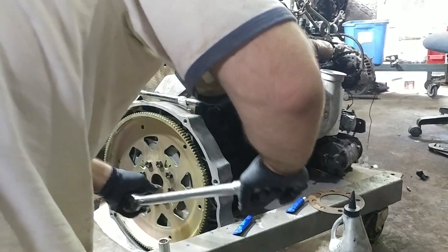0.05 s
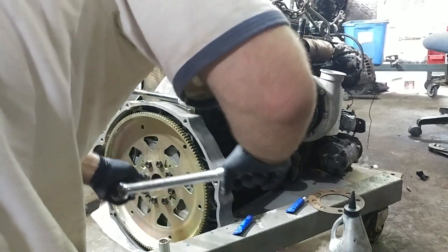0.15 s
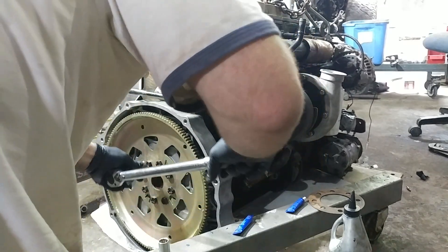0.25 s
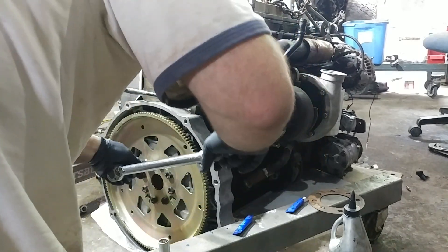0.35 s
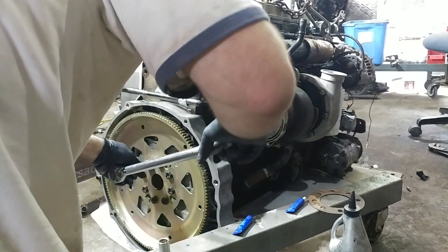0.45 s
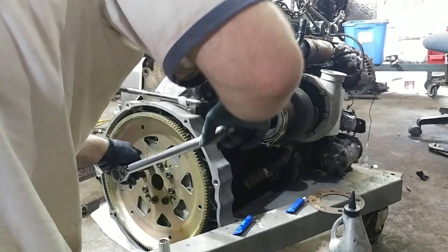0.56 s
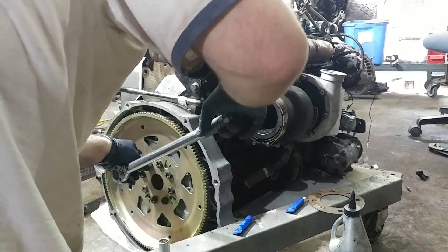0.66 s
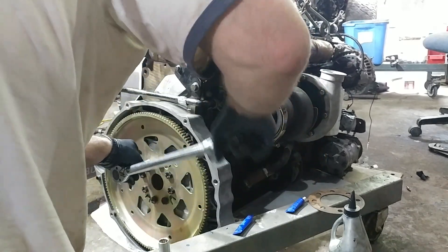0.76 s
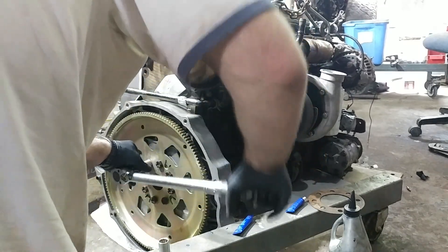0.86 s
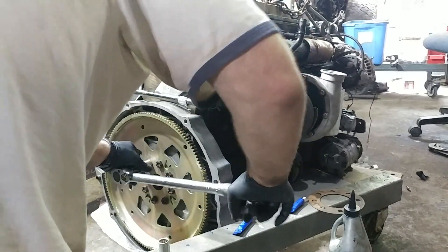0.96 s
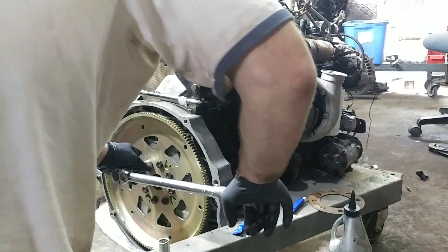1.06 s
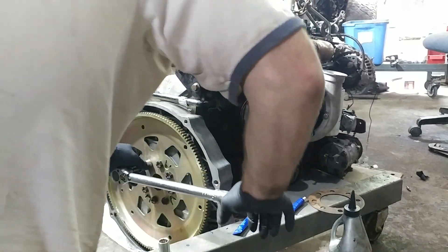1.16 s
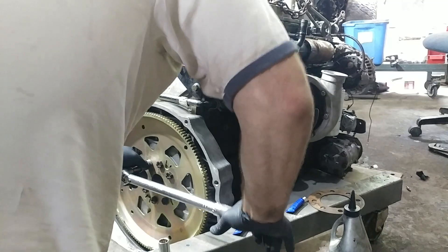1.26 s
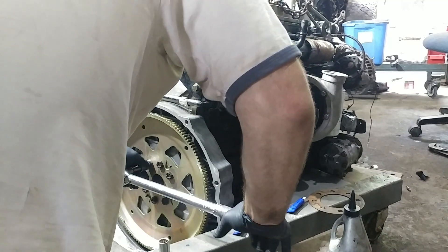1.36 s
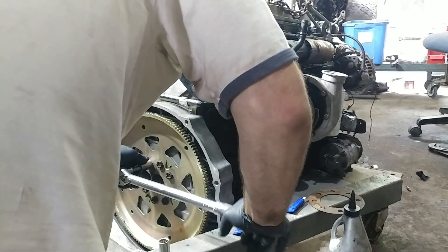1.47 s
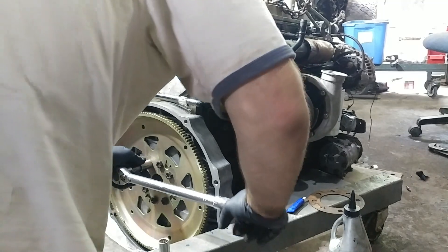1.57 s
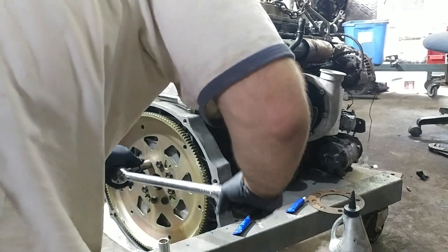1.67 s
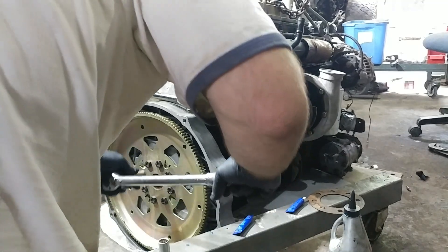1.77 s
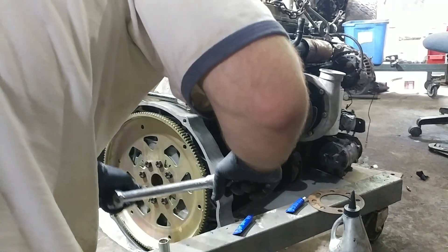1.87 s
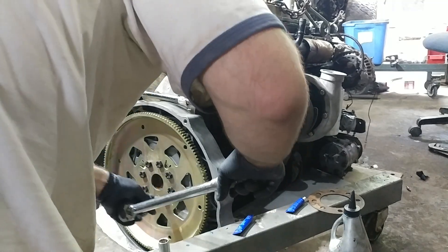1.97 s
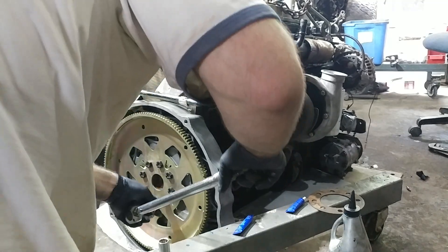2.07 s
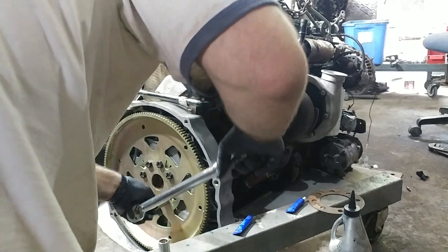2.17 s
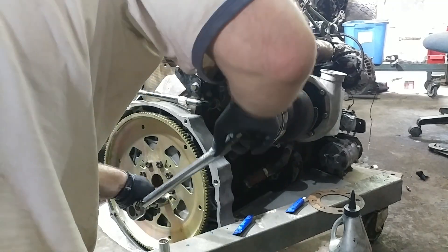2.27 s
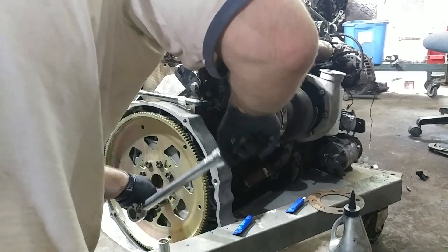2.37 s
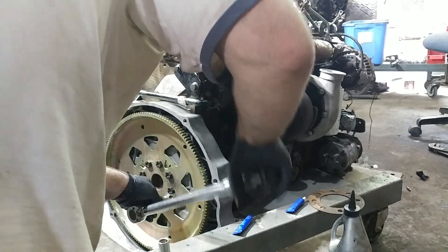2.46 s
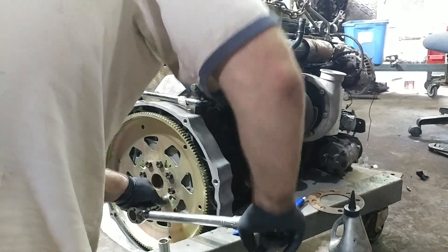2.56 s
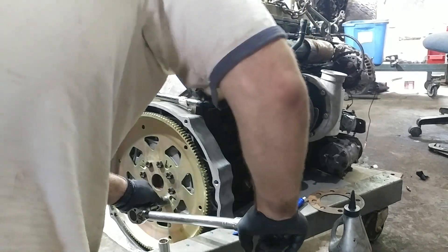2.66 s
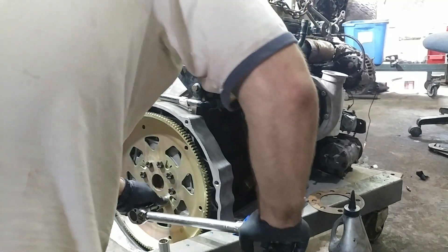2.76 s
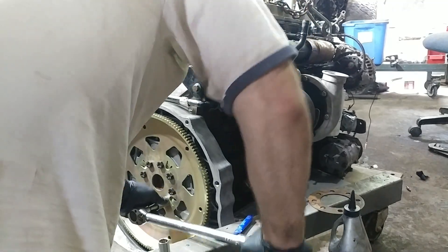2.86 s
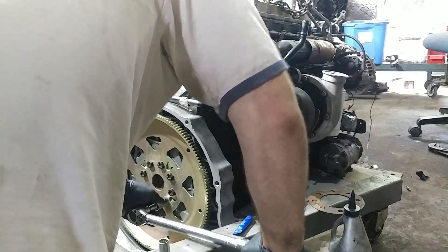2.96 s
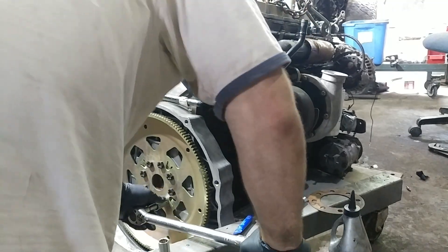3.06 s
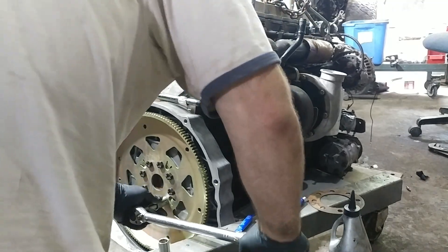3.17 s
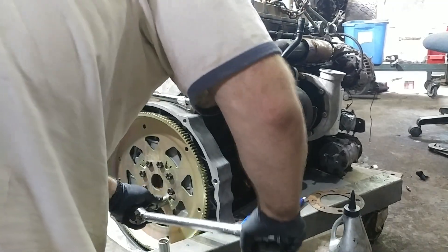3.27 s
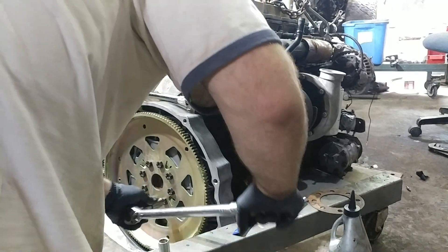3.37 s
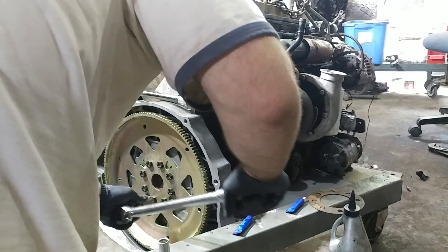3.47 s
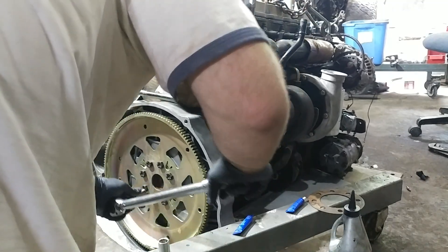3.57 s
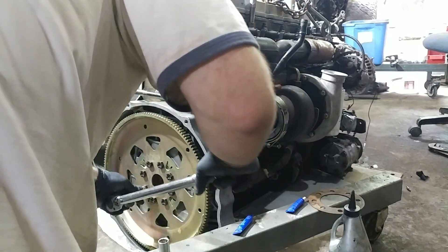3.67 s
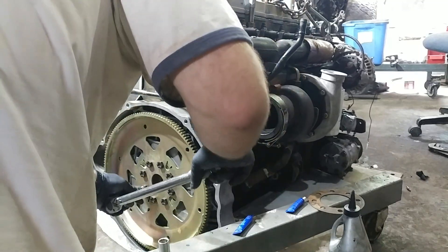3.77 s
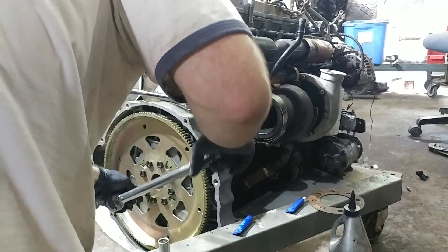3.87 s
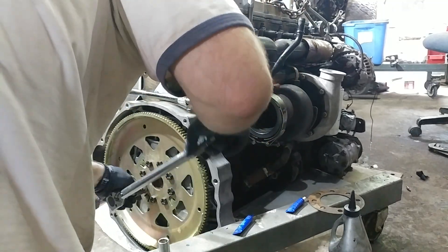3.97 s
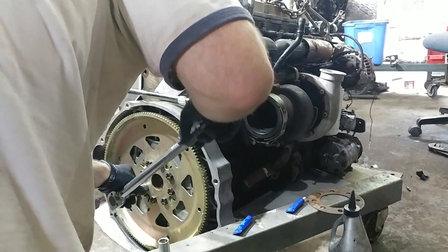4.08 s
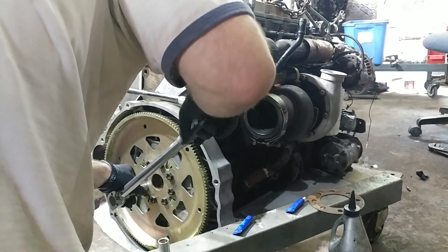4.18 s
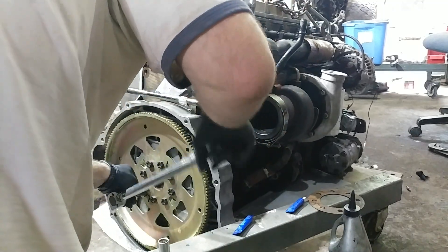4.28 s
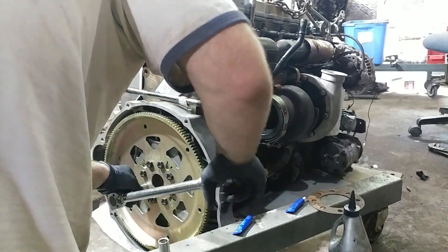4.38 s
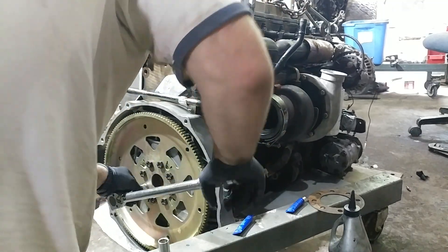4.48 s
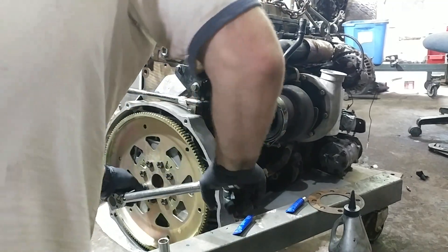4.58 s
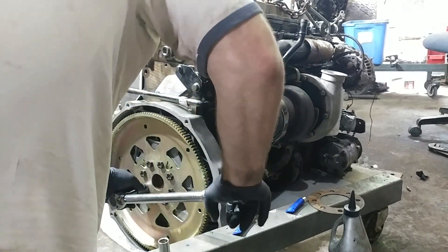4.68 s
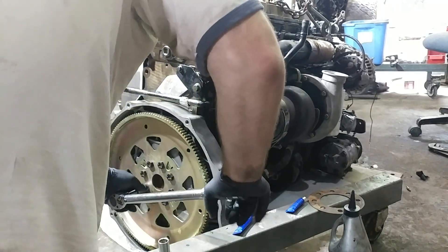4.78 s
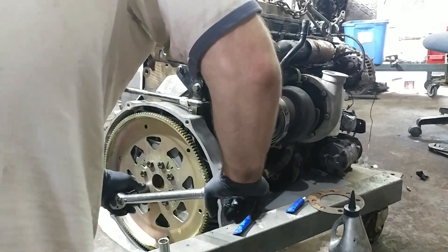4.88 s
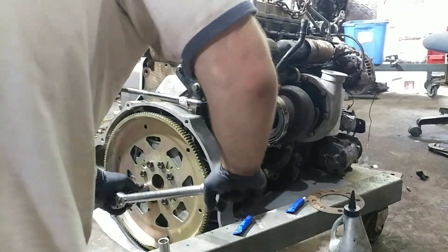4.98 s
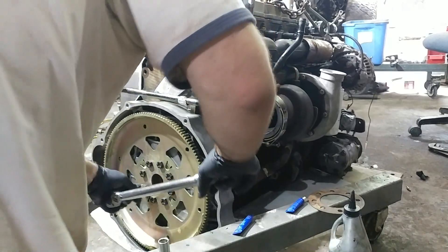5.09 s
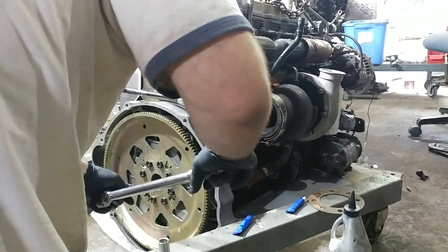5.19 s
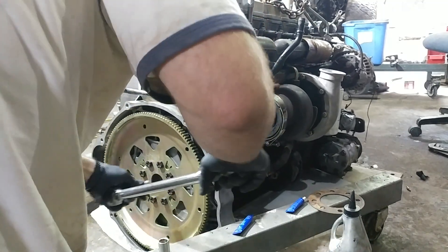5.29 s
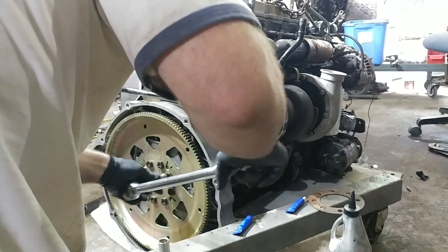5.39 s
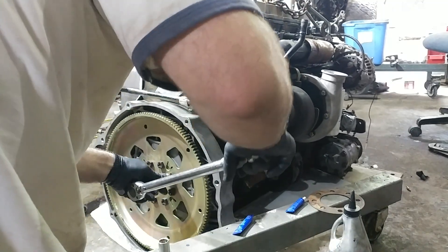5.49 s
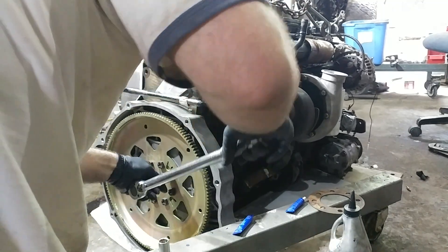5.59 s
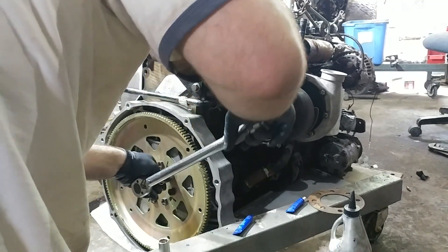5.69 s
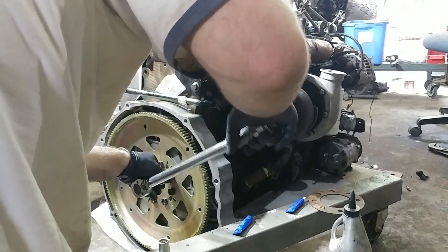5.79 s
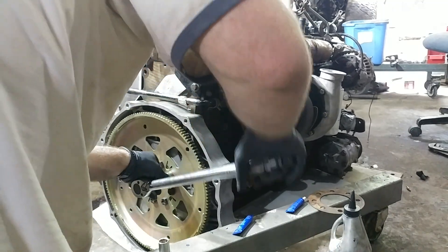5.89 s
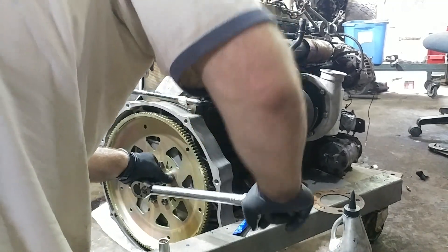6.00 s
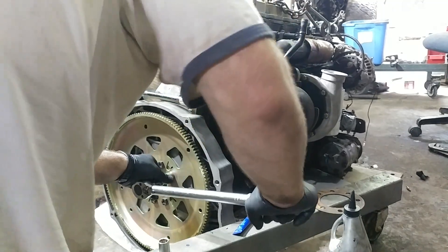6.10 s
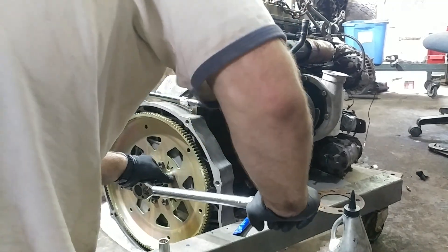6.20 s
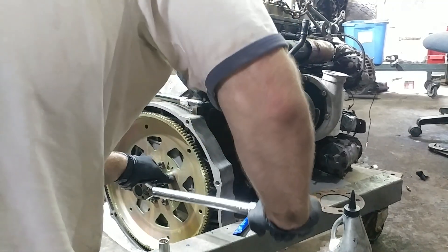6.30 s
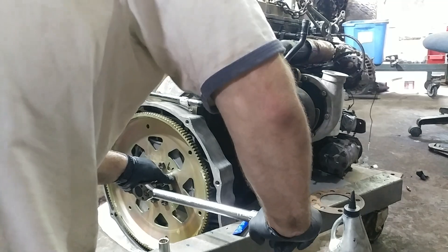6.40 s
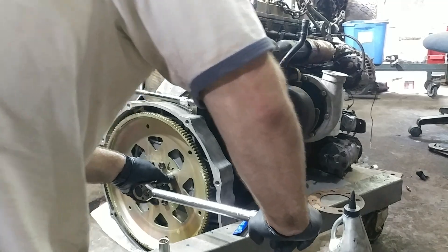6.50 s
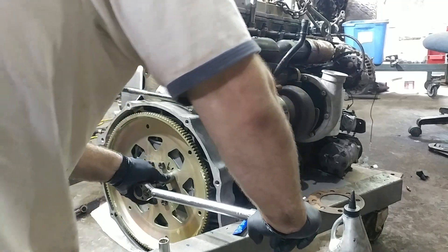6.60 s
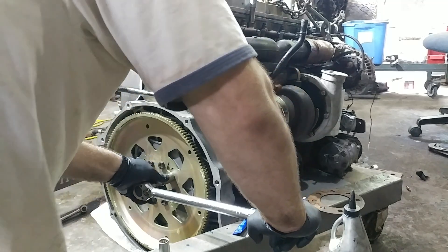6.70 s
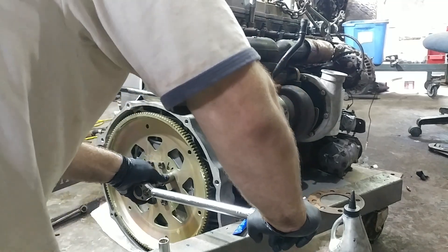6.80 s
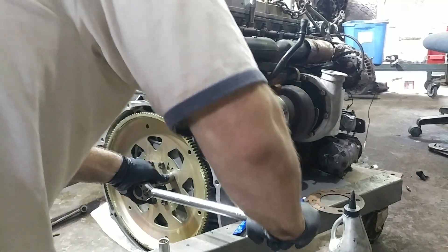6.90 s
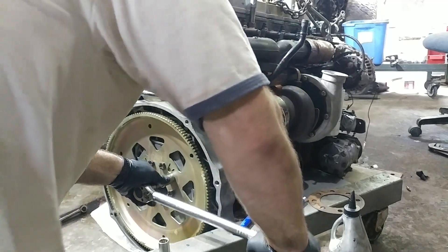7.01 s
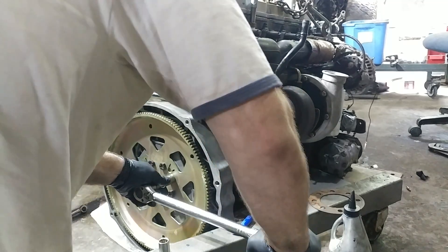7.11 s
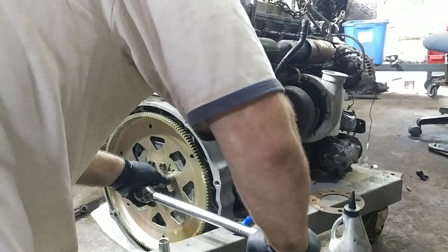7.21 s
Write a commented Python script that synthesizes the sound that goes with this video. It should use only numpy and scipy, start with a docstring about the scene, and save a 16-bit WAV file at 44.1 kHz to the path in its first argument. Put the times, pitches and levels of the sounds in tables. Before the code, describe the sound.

First socket knocks and a hard ratchet clack, then a bright wrench snap; more clinking, a second snap, busy clatter and a third snap, another cluster of knocks, and a final snap right at the end. Bare steel rings for a fraction of a second in a hard-walled workshop. Underneath, a thin hissy whine dips midway and returns slightly higher, over quiet bassy air.

```python
"""Torque wrench on a flywheel

In a workshop, flywheel bolts are tightened on an engine, heard through two microphone ports set close together.
The socket clinks and knocks onto bolts and flywheel, the ratchet head clacks, and at full torque the wrench
breaks with a loud snap that jolts the engine on its stand. Noise bursts make the clatter and decaying sines
the ringing; an echo tail adds the room. A faint high whine, rubbing cloth and room tone are shaped noise."""
import sys
import numpy as np
from scipy import signal
from scipy.fft import rfft, irfft, next_fast_len
from scipy.io import wavfile
from scipy.ndimage import uniform_filter1d

SR = 44100
rng = np.random.default_rng(int(sys.argv[2]) if len(sys.argv) > 2 else 0)


def store_wav(level_fs):
    """Save 16-bit WAV to argv[1]."""
    pcm = np.round(np.clip(np.atleast_2d(level_fs), -1, 1) * 32767)
    wavfile.write(sys.argv[1], SR, pcm.T.astype(np.int16))


N = 319725


def from_db(db):
    """Decibels to gain."""
    return 10 ** (np.asarray(db) / 20)


def rms_one(x):
    """Scale to unit rms."""
    return x / np.sqrt(np.mean(np.abs(x) ** 2) + 1e-20)


def at_hz(points, hz):
    """Read a table on a log-frequency axis."""
    f, value = np.transpose(points)
    return np.interp(np.log(np.maximum(hz, 1)), np.log(f), value)


def bins(size):
    """Frequencies in Hz of the spectrum of this many samples."""
    return np.arange(size // 2 + 1) * SR / size


def add(out, s, sound):
    """Mix a sound in at a time in seconds."""
    i = int(s * SR)
    out[:, i:i + sound.shape[-1]] += sound[..., :N - i]


# The ports are close together, so long waves reach both alike.
# Each row: frequency in Hz, left-right likeness from 0 to 1.
LIKENESS = [(150, 0.93), (400, 0.54), (1000, 0.49), (3000, 0.08), (15000, 0.14)]
PORT_LAG = 5  # samples by which shared sound reaches the right port later


def two_ports(size):
    """Spectra of white noise at both microphone ports; the shared part reaches the left one first."""
    hz = bins(size)
    shared, *own = rfft(rng.standard_normal((3, size)))
    alike = np.clip(at_hz(LIKENESS, hz), 0, 1)
    delay = np.exp(-2j * np.pi * hz / SR * [[0], [PORT_LAG]])
    return np.sqrt(alike) * shared * delay + np.sqrt(1 - alike) * np.array(own)


def clatter(colour, bass_db, treble_db, t60, rise_s, chatter_db):
    """Crowded steel modes die together within milliseconds while the faces chatter on each other."""
    size = SR // 4
    hz, t = bins(size), np.arange(size) / SR
    tilt_db = at_hz([(1400, bass_db), (2600, 0), (5500, 0), (11000, treble_db)], hz)
    gain = from_db(at_hz(colour, hz) + tilt_db)
    # the level is set by the 2 to 8.5 kHz range
    middle = (hz > 2000) & (hz < 8500)
    gain /= np.sqrt(np.mean(gain ** 2 * middle))
    chatter = rms_one(uniform_filter1d(rng.standard_normal(size), size=60))
    decay = from_db(-60 * t / t60 + chatter_db * chatter)
    return irfft(two_ports(size) * gain, size) * (1 - np.exp(-t / rise_s)) * decay


def ring(modes, rise_s, bass_db=0):
    """One blow on a body: modes start nearly in step, each with a slightly new strength; bass_db lifts low ones."""
    longest_s = max(t60 for _, _, t60 in modes)
    t, out = np.arange(int(1.2 * SR * longest_s)) / SR, 0
    for hz, db, t60 in modes:
        strength, start, apart = rng.uniform(-1, 1, 3)
        # the left port leads by the lag, and by a random phase where the ports are unlike
        skew = 2 * (1 - at_hz(LIKENESS, hz)) * apart + 2 * np.pi * hz * PORT_LAG / SR
        swing = np.exp((2j * np.pi * hz - np.log(1000) / t60) * t + 1j * start)
        gain = from_db(db + 2 * strength + at_hz([(1600, bass_db), (2600, 0)], hz))
        left, right = (swing * np.exp(1j * skew)).imag, swing.imag
        out = out + gain * np.array([left, right])
    return out * (1 - np.exp(-t / rise_s))


# The wrench breaks. Each row: start in seconds, level in dB before each layer's offset, extra bass in dB,
# extra treble in dB, engine jolt in dB.
BREAKS = [(1.253, -21.5, 3, 8.5, -45), (2.8935, -20.5, 4, 6.5, -33), (4.6712, -22, 4.5, 11, -38.5),
          (6.984, -20.5, 2, 8, -32)]
# Crowded, short-lived steel modes under a break. Each row: frequency in Hz, relative level per Hz in dB.
BREAK_COLOUR = [(35, -64.5), (60, -19), (189, -7), (274, -29.5), (651, -18.5), (785, -10), (1280, -23.5),
                (1550, -9.5), (2900, 3), (4970, 2), (5720, -6), (9350, -7), (12700, -16.5), (13900, -3.5),
                (16000, -35.5)]
# Ringing modes of the wrench tube, in three matching lists: frequency in Hz, relative level in dB, t60 in seconds.
WRENCH_HZ = [781, 2064, 2090, 2850, 3585, 4196, 4440, 4790, 4953, 6215, 7720, 8261, 12000, 14280]
WRENCH_DB = [-20, 5, 5, -2, 0, -1, 13, -22.5, -16.5, 9, 7.5, 3.5, 1.5, 2]
WRENCH_T60 = [0.22, 0.29, 0.096, 0.3, 0.26, 0.39, 0.13, .14, 0.17, 0.093, 0.11, 0.21, 0.044, .1]
WRENCH = list(zip(WRENCH_HZ, WRENCH_DB, WRENCH_T60))
# Ringing modes of the flywheel, which socket contacts also excite, in three matching lists:
# frequency in Hz, relative level in dB, t60 in seconds.
FLYWHEEL_HZ = [813, 926, 1170, 1276, 1567, 1587, 1823, 2529, 2847, 2939, 3150, 3213, 3304, 4721, 5131]
FLYWHEEL_DB = [0, -10.5, 6.5, -12, 2, 1, 0.5, 14, 9, 1.5, -13.5, 10, -11, 0, -2]
FLYWHEEL_T60 = [0.092, 0.15, 0.05, 0.13, 0.2, 0.34, 0.31, 0.13, 0.26, 0.39, 0.28, 0.27, 0.15, 0.41, 0.19]
FLYWHEEL = list(zip(FLYWHEEL_HZ, FLYWHEEL_DB, FLYWHEEL_T60))
# Modes of the engine on its stand. Each row: frequency in Hz, relative level in dB, t60 in seconds.
STAND = [(112, -11, .13), (156, -10, .2), (183, 0, .48), (208, -7, .16)]
STRAIN_LEAD_S, STRAIN_DB = 0.018, -52.5  # a faint dull tick of the loaded wrench before each break
GRIP_DETUNE = 0.005  # typical share by which the grip shifts each tube mode from break to break


def wrench_breaks():
    """The pawl snaps over: the tube cracks and rings, the flywheel answers, the engine jolts on its stand."""
    cracks, rings, jolts = np.zeros((3, 2, N))
    for s, db, bass_db, treble_db, jolt_db in BREAKS:
        tick = clatter(KNOCK_COLOUR, bass_db=20, treble_db=-5.5, t60=0.08, rise_s=0.001, chatter_db=5.0)
        add(cracks, s - STRAIN_LEAD_S, from_db(STRAIN_DB) * tick)
        snap = clatter(BREAK_COLOUR, bass_db, treble_db, t60=0.017, rise_s=0.00074, chatter_db=4.0)
        add(cracks, s, from_db(db + 11.5) * snap)
        # the parts rattle on after the snap
        rattle = clatter(BREAK_COLOUR, bass_db, treble_db, t60=0.088, rise_s=0.00083, chatter_db=0.93)
        add(cracks, s, from_db(db + 9.5) * rattle)
        gripped = [(hz * (1 + GRIP_DETUNE * rng.standard_normal()), mode_db, t60)
                   for hz, mode_db, t60 in WRENCH]
        add(rings, s, from_db(db - 9.0) * ring(gripped, rise_s=0.0007))
        add(rings, s, from_db(db - 14.0) * ring(FLYWHEEL, rise_s=0.0096))
        add(jolts, s, from_db(jolt_db) * ring(STAND, rise_s=0.012))
    return cracks, rings, jolts


# Modes of the socket. Each row: frequency in Hz, relative level in dB, t60 in seconds.
SOCKET = [(9241, -13, .1), (9442, 0, .028), (9514, -11, .15), (9590, -1, .025), (9620, 4, .012)]
SHORTER_DB_PER_DB = 0.2  # harder contacts die sooner: t60 shrinks by this many dB per dB of hardness


def socket_contacts(rows, colour, t60, crack_db, clatter_db, ping_db, rise_s):
    """Each contact cracks, clatters, pings the socket and rings the flywheel; hard ones are bright and short."""
    clatters, rings = np.zeros((2, 2, N))
    for s, db, bass_db, hard_db, socket_db, ring_db in rows:
        crack = clatter(colour, bass_db, hard_db - 1, t60=0.0079, rise_s=0.00021, chatter_db=3.0)
        add(clatters, s, from_db(db + crack_db) * crack)
        clatter_t60 = t60 * from_db(-SHORTER_DB_PER_DB * hard_db)
        body = clatter(colour, bass_db, hard_db, clatter_t60, rise_s, chatter_db=2.0)
        add(clatters, s, from_db(db + clatter_db) * body)
        add(rings, s, from_db(db + socket_db + ping_db) * ring(SOCKET, rise_s=0.0016))
        add(rings, s, from_db(db + ring_db) * ring(FLYWHEEL, rise_s=0.0077, bass_db=bass_db / 2))
    return clatters, rings


# The socket knocks on bolt and flywheel. Each row: start in seconds, level in dB before each layer's offset,
# extra bass in dB, hardness as extra treble in dB, socket ping in dB above the level before its offset,
# flywheel ring in dB above the level.
KNOCKS = [(0.3803, -21.5, 8, -1.5, -1, -13.5), (0.541, -25, 9.5, 0, -3, -9),
          (1.528, -40.5, 2.5, -1, -13, -13), (2.0855, -19, -3.5, 5.5, 10, -17.5),
          (2.155, -42.5, 13.5, 1, -13, -4.5), (2.2412, -22, 4, 5, -18, -19.5), (2.47, -58, 14, -18, 4, 0),
          (2.575, -63.5, 17, -1, -11, 1), (3.034, -35, 4, 1, -24, -11), (3.301, -49.5, 3, 2.5, -18, -29),
          (3.46, -65, 20.5, 2.5, -11, -29), (3.7002, -17.5, 5.5, 7.5, -2, -24),
          (4.099, -15.5, 2, 9.5, -2.5, -20), (4.83, -40.5, -4, -5, -22, -17),
          (5.087, -44.5, 5.5, -10.5, -12, -20.5), (5.466, -14, -0.5, 6.5, -2.5, -14),
          (5.637, -31, 3, -3.5, -15, -13), (5.7295, -17.5, 0.5, 0, 5.5, -19.5),
          (6.033, -31.5, 5, -6, -3, -15)]
# Crowded steel modes under a knock. Each row: frequency in Hz, relative level per Hz in dB.
KNOCK_COLOUR = [(120, -65), (200, -37), (647, -17), (777, -8), (1040, -13), (1590, -6.5), (2250, -2.5),
                (2860, 1), (4430, -3.5), (4950, -1), (6760, -11.5), (9230, -4.5), (10500, -24),
                (14900, -19), (16000, -27)]


def socket_knocks():
    """The socket strikes bolt and flywheel, and the flywheel rings by its own amount each time."""
    return socket_contacts(KNOCKS, KNOCK_COLOUR, t60=0.1, crack_db=-5.5, clatter_db=2.0, ping_db=-0.5,
                           rise_s=0.0014)


# Light clinks of socket and ratchet head. Each row: start in seconds, level in dB before each layer's offset,
# extra bass in dB, hardness as extra treble in dB, socket ping in dB above the level before its offset.
CLINKS = [(0.4434, -25, 10, -8.5, 11), (0.5208, -26, 5, -2.5, 6.5), (0.917, -33.5, 6.5, -11, 13),
          (0.9458, -30.5, 9.5, 0, -2), (1.951, -38, -8, 1, -21), (2.082, -24.5, -17, -9, 0),
          (2.2107, -26, 4, -5, -7), (2.6008, -27.5, 7.5, -0.5, 4), (3.7296, -26, -38, 0, 11),
          (3.903, -31.5, 4.5, 6, 16.5), (3.985, -34.5, -20, 4, -17.5), (4.048, -32, -13, 3, -17),
          (4.0908, -29.5, 1, 0, -12), (4.3929, -22.5, 4.5, 2, -9), (5.13, -41, -10, 2.5, -17),
          (5.651, -30, 4.5, 1, -16), (5.7065, -26, 7, -3, 0.5), (6.0364, -24, 8, 8.5, 2.5)]
# Crowded steel modes under a clink. Each row: frequency in Hz, relative level per Hz in dB.
CLINK_COLOUR = [(180, -81), (300, -30.5), (1340, -15.5), (2650, -1.5), (3240, -4), (3700, 0.5),
                (5340, -3.5), (6850, -7), (7820, 0.5), (9550, -2), (10600, -13.5), (13100, -3),
                (16000, -12)]
CLINK_RING_DB = -24  # relative to the clink: it barely rings the flywheel


def socket_clinks():
    """Light steel contacts: sharp cracks and socket pings with hardly any flywheel."""
    rows = [(*row, CLINK_RING_DB) for row in CLINKS]
    return socket_contacts(rows, CLINK_COLOUR, t60=0.073, crack_db=4.5, clatter_db=2.0, ping_db=3.5,
                           rise_s=0.00028)


# The ratchet head takes up its play with a short clack. Each row: start in seconds, level in dB.
CLACKS = [(0.8475, -23), (0.9239, -10), (0.9471, -19.5), (1.666, -31), (1.688, -29.5), (2.6075, -18.5),
          (4.397, -11), (6.034, -17)]
# Modes of the ratchet head. Each row: frequency in Hz, relative level in dB, t60 in seconds.
RATCHET_HEAD = [(2176, -12, 0.039), (2700, 2, 0.007), (3155, 1, 0.013), (3473, -1.5, 0.03),
                (3860, -2.5, 0.0054), (4000, -15, 0.011), (8400, -8.5, 0.019)]
CLACK_CHATTER_DB = -10  # chatter of the meeting teeth, relative to the clack


def ratchet_head():
    """The pawl seats in its tooth as the handle is loaded: a brief chatter, and the head rings."""
    chatters, rings = np.zeros((2, 2, N))
    for s, db in CLACKS:
        teeth = clatter(CLINK_COLOUR, bass_db=13, treble_db=-12, t60=0.028, rise_s=0.0014, chatter_db=4.0)
        add(chatters, s, from_db(db + CLACK_CHATTER_DB) * teeth)
        add(rings, s, from_db(db) * ring(RATCHET_HEAD, rise_s=0.00042))
    return chatters, rings


# Decay of the workshop. Each row: frequency in Hz, t60 in seconds.
WORKSHOP_T60 = [(100, 1), (300, 0.78), (800, 0.44), (2000, 0.53), (4500, 0.42), (8000, 0.47), (15000, 0.3)]


def workshop(x, wet_db, build_s):
    """Reflections off engine, bench and walls merge into a tail that dies band by band."""
    size = SR
    t, white, tail = np.arange(size) / SR, two_ports(size), 0
    edges = np.geomspace(40, SR / 2, 13)
    for low, high in zip(edges, edges[1:]):
        in_band = (bins(size) >= low) & (bins(size) < high)
        t60 = at_hz(WORKSHOP_T60, np.sqrt(low * high))
        tail = tail + irfft(white * in_band, size) * from_db(-60 * t / t60)
    tail = rms_one(tail * (1 - np.exp(-t / build_s))) / np.sqrt(size)
    return x + from_db(wet_db) * signal.fftconvolve(x, tail, axes=1)[:, :N]


def hiss_band(centre_hz, width_hz):
    """Noise reaching width_hz to each side of a moving centre, partly shared by the ports; rms 1."""
    lowpass = signal.butter(2, width_hz, fs=SR, output="sos")
    slow = signal.sosfilt(lowpass, rng.standard_normal((2, 3, N)))
    carrier = np.exp(2j * np.pi * np.cumsum(centre_hz) / SR)
    shared, left, right = (rms_one(slow[0] + 1j * slow[1]) * carrier).real
    return rms_one(np.array([shared, np.roll(shared, PORT_LAG)]) + 1.5 * np.array([left, right]))


# Course of the whine. Each row: time in seconds, level in dB, read as a swing about the usual level.
WHINE = [(0.1, -47.5), (1.15, -48.5), (2.02, -49), (2.45, -53.5), (2.8, -56.5), (3.6, -58.5), (4.58, -59.5),
         (4.98, -53), (5.38, -51.5), (5.93, -48), (6.6, -48.5), (7.19, -44.6)]
WHINE_USUAL_DB = -48
# Its noisy bands. Each row: centre before the step in Hz, reach to each side in Hz, dB at the usual level
# before the step, share of the level swing, extra gain in dB once the pitch is up.
WHINE_BANDS = [(4600, 450, -58, 0.64, 3.5), (8922, 427, -45.5, 1.0, -1.2), (12800, 570, -64, 0.56, 3.5)]
STEP_AT_S, STEP_S, STEP_SHARE = 5.03, 0.35, 0.031  # pitch step: start, glide time, share of the pitch


def whine():
    """Three noisy bands swell and sink together and step up in pitch once."""
    t = np.arange(N) / SR
    swing_db = np.interp(t, *np.transpose(WHINE)) - WHINE_USUAL_DB
    up = np.clip((t - STEP_AT_S) / STEP_S, 0, 1)
    out = 0
    for hz, width_hz, db, share, up_db in WHINE_BANDS:
        gain = from_db(db + share * swing_db + up_db * up)
        out = out + gain * hiss_band(hz * (1 + STEP_SHARE * up), width_hz)
    return out


def steady_noise(colour):
    """Stereo noise with a given spectrum, rms 1."""
    size = next_fast_len(N, True)
    return rms_one(irfft(two_ports(size) * from_db(at_hz(colour, bins(size))), size)[:, :N])


# Shirt and gloves rub as the arms move.
# Each row: middle in seconds, length between the 1/e points in seconds, peak level in dB.
RUBS = [(3.744, 0.23, -61.5), (4.248, 0.15, -57), (6.34, 0.027, -59.5), (6.464, 0.14, -64),
        (7.12, 0.25, -65.5)]
# Spectrum of the cloth. Each row: frequency in Hz, relative level per Hz in dB.
CLOTH = [(100, -6), (350, 2.5), (600, -6), (1200, -12.5), (4000, -40), (12000, -46.5)]
CLOTH_REST_DB = -81.5


def cloth():
    """Each rub swells and fades smoothly over a slight constant rustle."""
    t = np.arange(N) / SR
    rubs = sum(from_db(db) * np.exp(-(2 * (t - s) / length) ** 2) for s, length, db in RUBS)
    return (from_db(CLOTH_REST_DB) + rubs) * steady_noise(CLOTH)


# Spectrum of the quiet room. Each row: frequency in Hz, relative level per Hz in dB.
ROOM_TONE = [(20, -39), (35, -10.5), (52, 7), (100, 4.5), (170, -1), (300, -7), (600, -15.5), (1500, -20.5),
             (3000, -18), (7000, -18.5), (11000, -23.5), (16000, -18.5)]
ROOM_TONE_DB = -61.5


def room_tone():
    """A steady murk of noise, strongest in the bass."""
    return from_db(ROOM_TONE_DB) * steady_noise(ROOM_TONE)


# Balance of the two ports. Each row: frequency in Hz, left minus right in dB.
BALANCE_DB = [(100, 0.5), (800, 0), (1300, -1.1), (2200, 3), (4400, 2), (6500, 3), (8500, 7), (9700, 7),
              (11500, -2.5), (15000, 2)]


def port_balance(air):
    """The two microphone ports hear the treble unequally: half the difference goes to each side."""
    size = next_fast_len(N + SR, True)
    gain = from_db(at_hz(BALANCE_DB, bins(size)) * [[0.5], [-0.5]])
    return irfft(rfft(air, size) * gain, size)[:, :N]


def scene():
    """Tool sounds in the workshop over whine, cloth and room tone, as they reach the two ports."""
    cracks, wrench_rings, jolts = wrench_breaks()
    knocks, knock_rings = socket_knocks()
    clinks, clink_rings = socket_clinks()
    clacks, head_rings = ratchet_head()
    air = workshop(cracks + knocks + clinks + clacks, wet_db=-8.5, build_s=0.003)
    air += workshop(wrench_rings + knock_rings + clink_rings + head_rings, wet_db=-14.5, build_s=0.0013)
    air += jolts + whine() + cloth() + room_tone()
    return port_balance(air)


CUTOFF_HZ = 15800


def record(dry):
    """The loudest peaks are rounded off and the top is cut."""
    rounded = dry / (1 + dry ** 4) ** 0.25
    lowpass = signal.ellip(10, 0.2, 80, CUTOFF_HZ, fs=SR, output="sos")
    return signal.sosfilt(lowpass, rounded)


dry = scene()
out = record(dry)
store_wav(out)
```